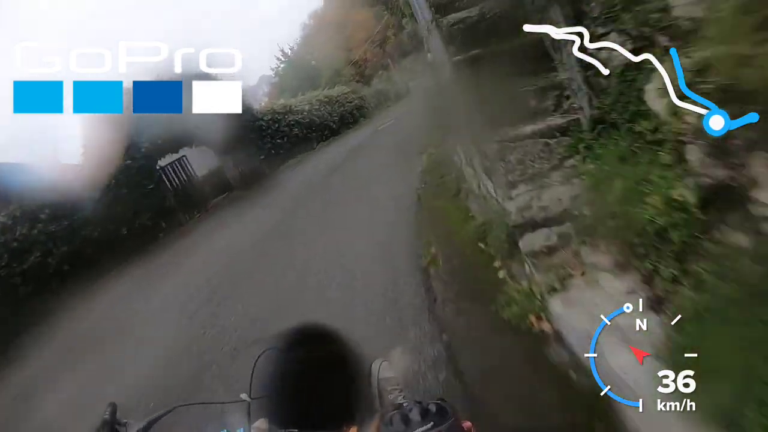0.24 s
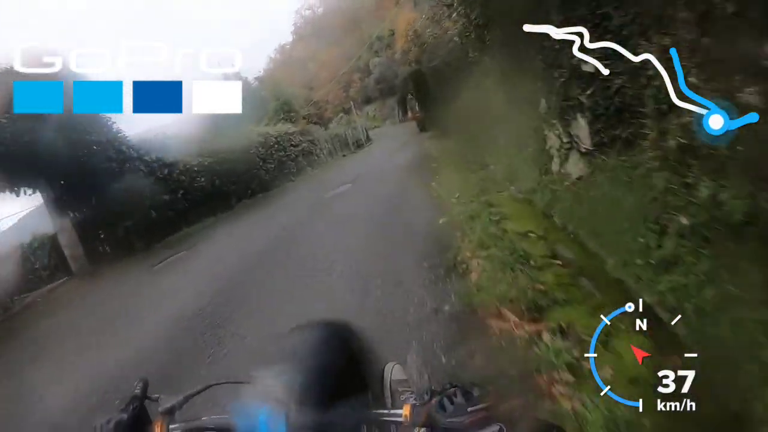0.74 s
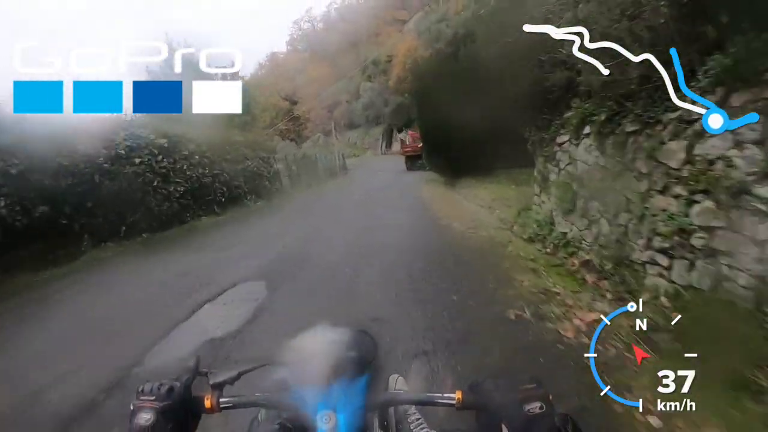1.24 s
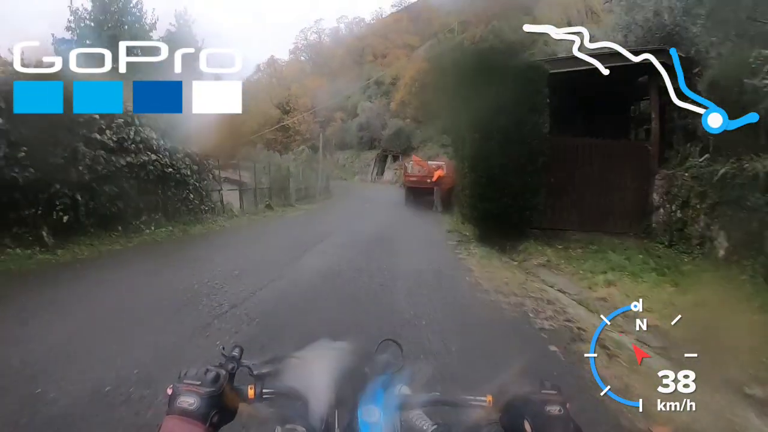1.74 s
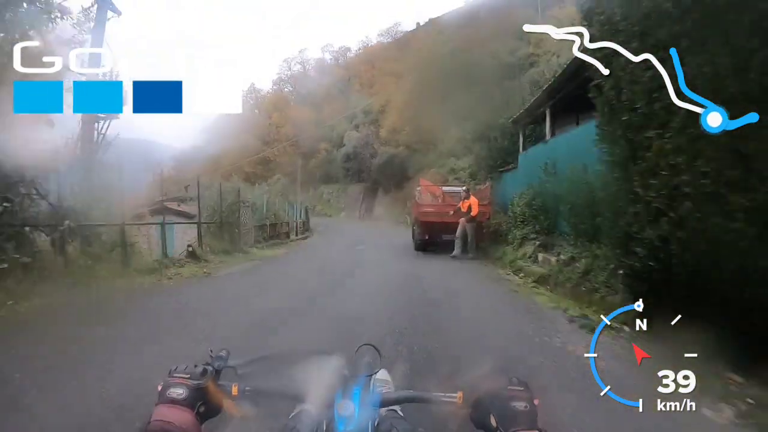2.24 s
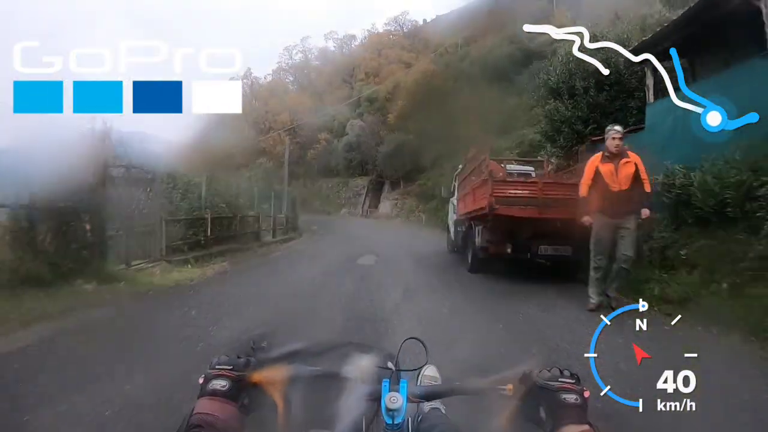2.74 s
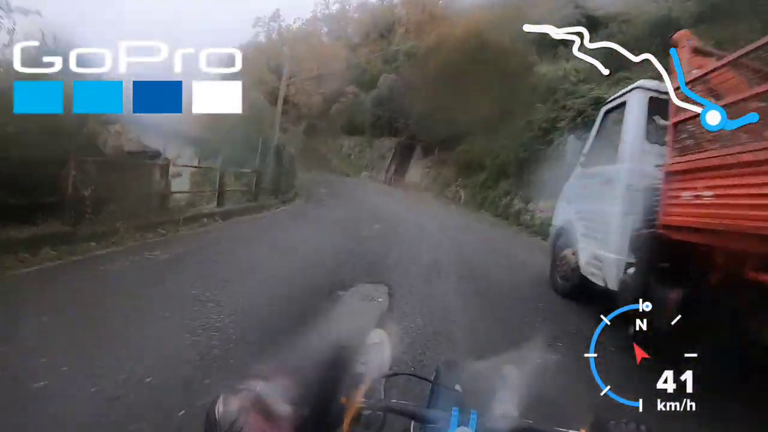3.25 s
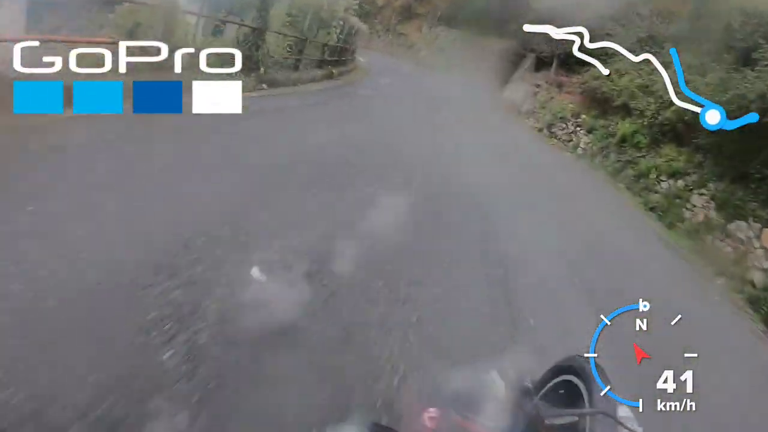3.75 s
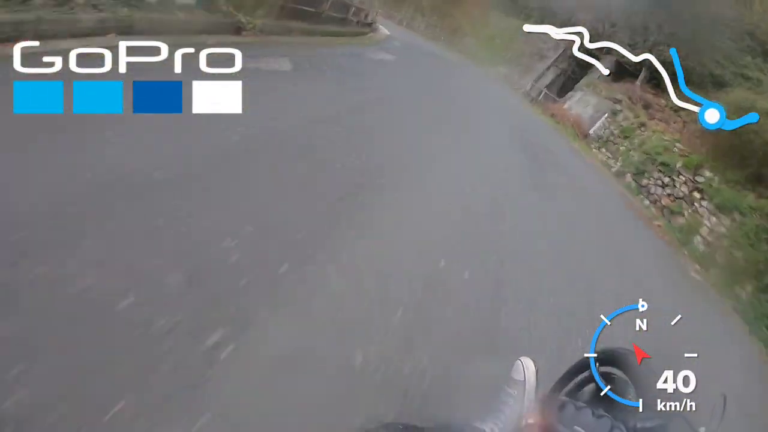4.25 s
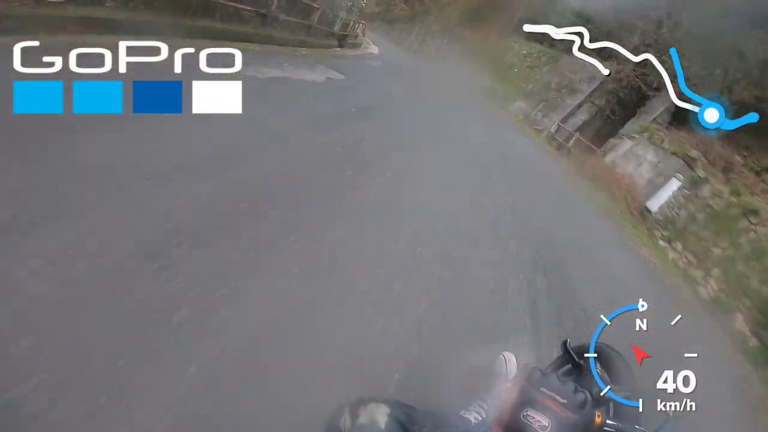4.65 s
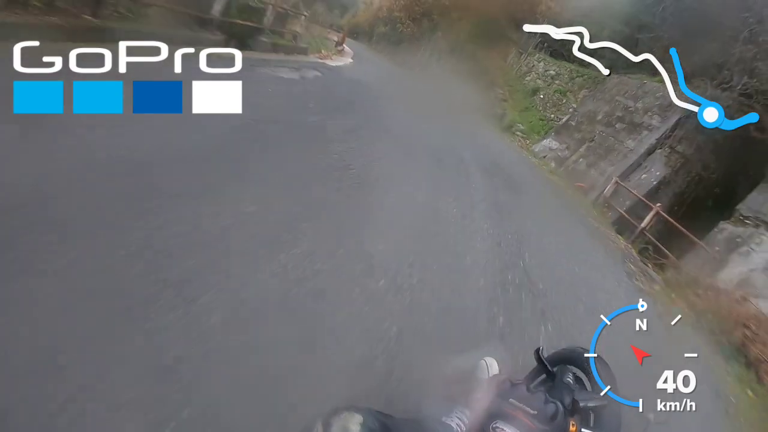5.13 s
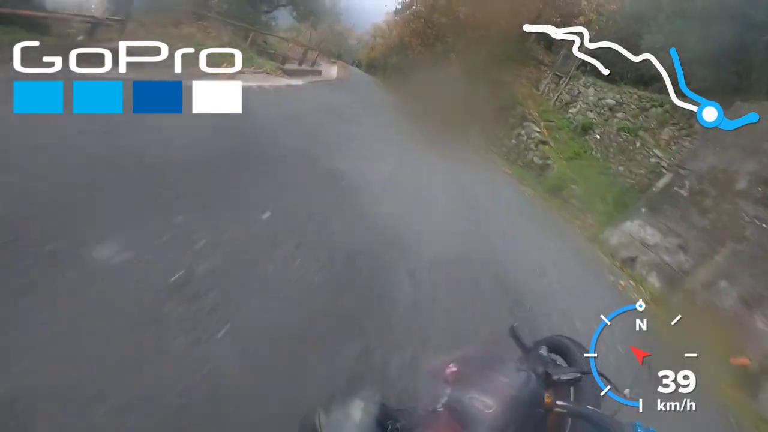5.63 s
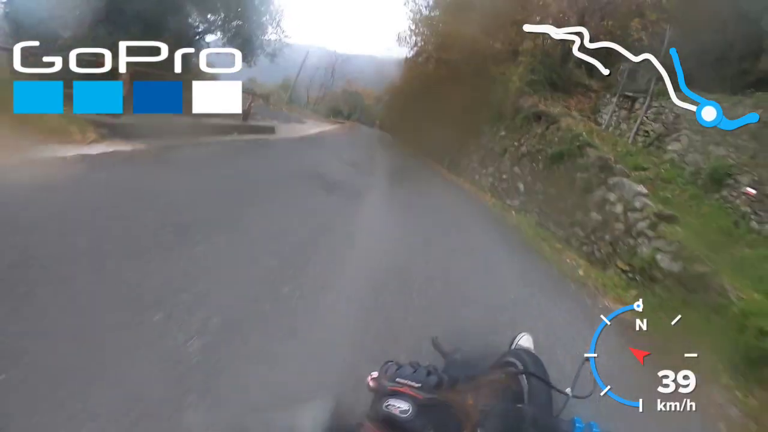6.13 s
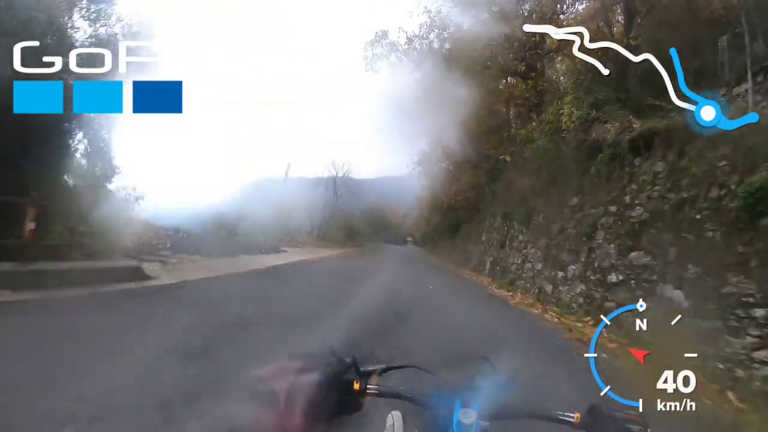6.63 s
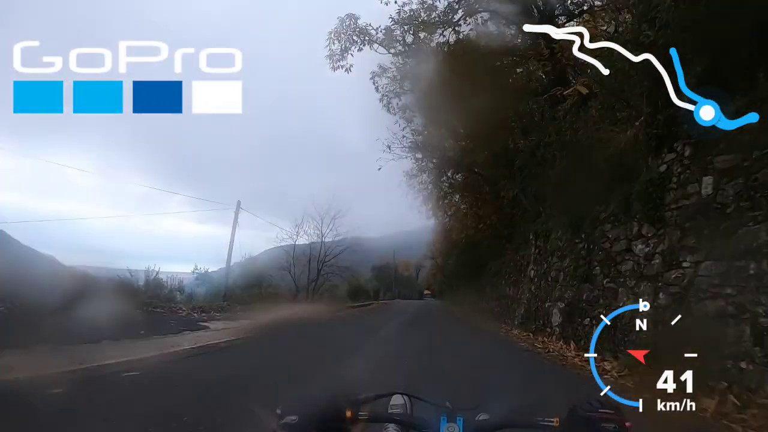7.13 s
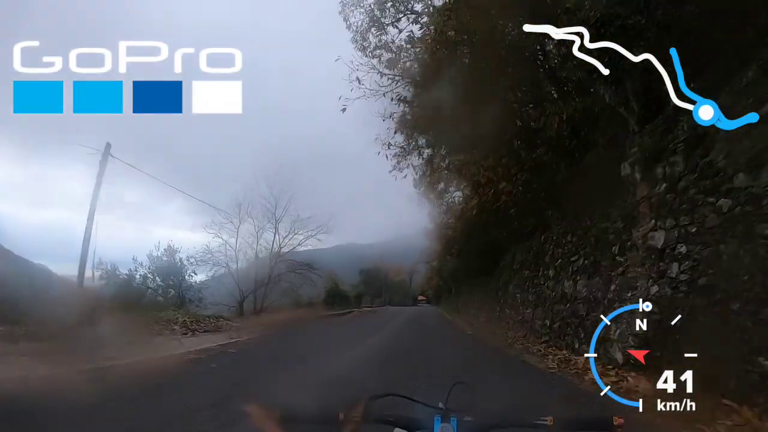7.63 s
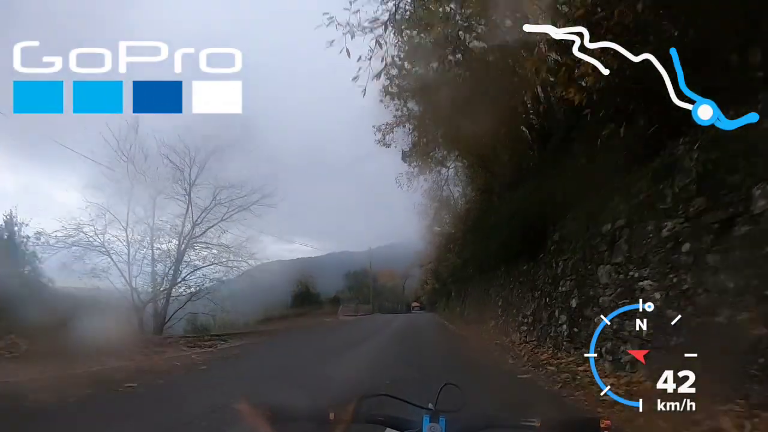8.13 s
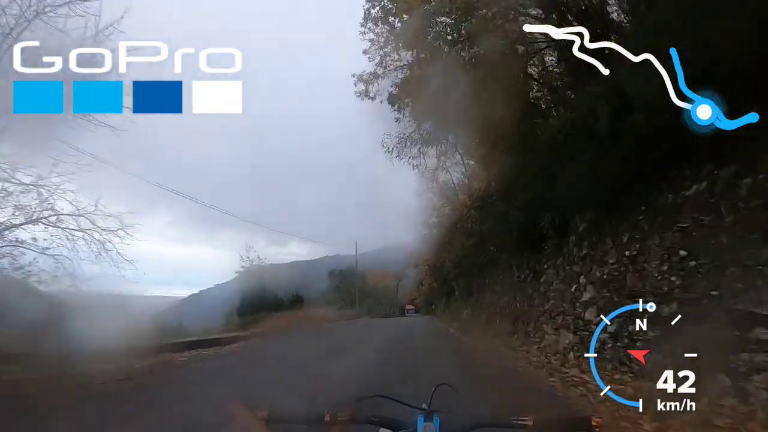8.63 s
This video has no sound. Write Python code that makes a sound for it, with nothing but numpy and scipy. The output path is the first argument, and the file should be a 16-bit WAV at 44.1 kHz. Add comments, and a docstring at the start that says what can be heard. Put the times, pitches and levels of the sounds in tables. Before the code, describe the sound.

A small hard-wheeled trike coasts down a wet asphalt road, low shaking rumble and hollow wheel drumming, brief skids, wind and rattle rising late.

```python
"""A drift trike coasts down a wet mountain road, heard from aboard.
From the start coarse asphalt shakes the frame (a wandering low tone and dull noise) and drums in the hollow
wheels (tiny random hits through resonances), while wet grit sizzles and wind tears past (shaped noise).
Short skids rasp, drops tick on the housing and gritty scuffs burst out; early on, a few pebbles strike the frame.
The rear wheels scrub sideways through a long bend; on the last straight the headwind and rattle rise."""
import sys
import numpy as np
from scipy import signal
from scipy.fft import rfft, irfft
from scipy.io import wavfile
from scipy.ndimage import uniform_filter1d, map_coordinates

SR = 44100
rng = np.random.default_rng(int(sys.argv[2]) if len(sys.argv) > 2 else 0)


def materialize(psi):
    """Save the field psi as 16-bit PCM at rate SR to the path in sys.argv[1].

    A 1-D psi becomes a single channel; in a 2-D psi each row is a channel.
    """
    bounded = np.clip(np.atleast_2d(psi).T, -1, 1)
    quanta = np.round(bounded * 32767).astype(np.int16)
    wavfile.write(sys.argv[1], SR, quanta)


N = 391608
TIME = np.arange(N) / SR

# shaking of the frame, from the coarseness of the road and the speed: [t/s, level/dB]
SHAKE_CURVE = [(0, -39), (.7, -40.5), (1.1, -45), (1.95, -41.5), (2.15, -34.5), (2.85, -31.5), (3.07, -26),
               (3.35, -34.5), (4.05, -34.5), (4.95, -36.5), (5.75, -34.5), (6.4, -41.5), (6.7, -34.5),
               (6.85, -29.5), (8.88, -30)]
# headwind: [t/s, level/dB]
WIND_CURVE = [(0, -72.5), (1.3, -77), (2.3, -70), (2.9, -62), (3.3, -68), (4.2, -72.5), (5.4, -72.5),
              (6.45, -72), (6.9, -62.5), (7.5, -61.5), (8.3, -59.5), (8.88, -60.5)]
# bumps and rough patches that throw the frame: [t/s, level/dB, length/s]
ROAD_BUMPS = [(.29, -37.5, 0.022), (.63, -38, 0.028), (.835, -39.5, 0.023), (1.335, -38.5, 0.011),
              (1.76, -35.5, 0.02), (2.155, -36, 0.019), (2.42, -33, 0.02), (2.935, -30, 0.015),
              (3.01, -24, 0.018), (3.655, -34.5, 0.013), (3.85, -35.5, 0.024), (4.24, -24, 0.011),
              (5.84, -24, .016), (6.12, -31, 0.026), (6.875, -27.5, 0.018), (6.98, -28.5, 0.037),
              (7.21, -25.5, 0.014), (7.3, -28.5, 0.025), (7.61, -29, 0.025), (7.77, -26.5, 0.033),
              (8.085, -22.5, 0.017), (8.37, -23.5, 0.027), (8.56, -25, 0.064), (8.8, -26, 0.016)]
UNEVEN_PER_S = 17  # speed of the road's random unevenness, roughly in changes per second


def from_db(db):
    """Turn decibels into a gain."""
    return 10 ** (np.asarray(db) / 20)


def rms_one(x):
    """Scale a signal to an average power of 1."""
    return x / np.sqrt(np.mean(x ** 2) + 1e-20)


def noise():
    """White noise: an even hiss with all pitches in it."""
    return rng.standard_normal(N)


def drift(rate):
    """Slow random wandering with spread 1; rate is roughly in changes per second."""
    step = 40  # samples between the computed points
    r = np.exp(-2 * step * np.pi * rate / SR)
    settle = 2000  # points dropped while the filter starts up
    slow_noise = rng.standard_normal(N // step + settle + 2)
    slow = signal.lfilter([1], [1, -2 * r, r * r], slow_noise)[settle:]
    return np.interp(np.arange(N) / step, np.arange(len(slow)), rms_one(slow))


def grains(per_s, spread_db):
    """Tiny hits at random times, of uneven size and either sign; rms 1."""
    size_db = spread_db * np.minimum(rng.exponential(1, N), 4)
    sizes = from_db(size_db) * rng.choice([-1, 1], N)
    return rms_one(sizes * (rng.random(N) < per_s / SR))


def clicks(rows):
    """One single-sample click for each row of time and level."""
    out = np.zeros(N)
    for s, db in rows:
        out[round(s * SR)] = from_db(db)
    return out


def coloured(x, spectrum):
    """Strengthen and weaken the pitches of a sound to follow a spectrum; rms 1."""
    hz, db = np.transpose(spectrum)
    bins = np.maximum(np.arange(N // 2 + 1) * SR / N, 1)
    gain = from_db(np.interp(np.log(bins), np.log(hz), db))
    return rms_one(irfft(rfft(x) * gain, N))


def resonate(x, modes):
    """Let a sound excite several resonances side by side, with alternating signs; rms 1."""
    out = 0
    for k, (hz, width, db) in enumerate(modes):
        r = np.exp(-np.pi * width / SR)  # a narrower resonance rings longer
        poles = [1, -2 * r * np.cos(2 * np.pi * hz / SR), r * r]
        ring = (1 - r * r) / 2 * signal.lfilter([1, 0, -1], poles, x)
        out = out + (-1) ** k * from_db(db) * ring
    return rms_one(out)


def cut(x, hz, kind, order=2):
    """Keep only what lies below ("low") or above ("high") a frequency."""
    sos = signal.butter(order, min(hz, SR / 2 - 1), kind, fs=SR, output="sos")
    return signal.sosfilt(sos, x + 1e-18)


def steadied(x, span_s):
    """Even out the swells of a vibration that last longer than span_s."""
    size = max(int(span_s * SR), 2)
    power = uniform_filter1d(uniform_filter1d(x * x, size), size)
    return x / np.sqrt(power + 1e-9)


def wavering(x, share, per_s):
    """Let the pitch wander by a share of itself, by reading the sound now faster, now slower."""
    position = np.arange(N) + np.cumsum(share * drift(per_s))
    return map_coordinates(x, [position], order=3, mode="mirror")


def curve(rows):
    """Join the points of a control with straight lines."""
    return np.interp(TIME, *np.transpose(rows))


def swells(rows):
    """Sum of brief bell-shaped swells in level."""
    return sum(from_db(db) * np.exp(-((TIME - s) / length) ** 2 / 2) for s, db, length in rows)


def thumps(rows):
    """Sum of short tones that swell and fade smoothly."""
    out = 0
    for s, db, length, hz in rows:
        tone = np.sin(2 * np.pi * hz * (TIME - s))
        out = out + np.sqrt(2) * swells([(s, db, length)]) * tone
    return out


def lull(depth_db):
    """Gain that dips on each smooth patch of road."""
    # smooth patches: [t/s, length/s]
    smooth_patches = [(0.52, 0.02), (0.905, 0.01), (0.998, 0.022), (1.414, 0.0088), (2.282, 0.0094),
                      (2.513, 0.036), (2.84, .01), (3.436, .02), (3.974, 0.016), (4.19, 0.014),
                      (4.889, 0.018), (5.246, 0.016), (5.508, 0.025), (5.919, 0.013), (6.014, 0.012),
                      (6.388, 0.028), (6.698, 0.024), (7.083, 0.01), (7.369, 0.0089), (7.483, 0.0069),
                      (7.673, 0.011), (7.853, .016), (8.447, 0.012), (8.664, 0.013)]
    return from_db(depth_db * swells([(s, 0, length) for s, length in smooth_patches]))


def with_slip(straight_db, slip_db):
    """Gain that starts from the level when running straight and gains slip_db at full slip."""
    # sideways slip of the rear wheels, greatest in the long bend: [t/s, slip 0-1]
    slip_curve = [(0, 0.6), (.5, 0.6), (1.35, 0.26), (2.4, 0), (3.35, 0.3), (3.55, 0.85), (4.3, 1),
                  (4.85, 1), (5.95, 0.79), (6.35, 0.55), (7.9, 0.56), (8.5, 0.33), (8.88, 0.36)]
    return from_db(straight_db + slip_db * np.maximum(curve(slip_curve), 0))


def frame():
    """The road bounces the frame and flutters the fork over a dull rumble; bumps throw them harder."""
    # spectrum of the rumble: [f/Hz, relative level/dB]
    rumble_spectrum = [(15, -0.5), (30, 8), (60, 0.5), (85, -0.5), (135, -8.5), (230, -27.5), (400, -42.5),
                       (900, -46.5)]
    # resonance of the fork: [f/Hz, width/Hz, relative level/dB]
    fork_modes = [(103.6, 20, 0)]
    # flutter of the fork: [t/s, level/dB]
    fork_curve = [(0, -58), (.7, -53.5), (1.25, -58.5), (1.65, -47.5), (2.05, -59.5), (3.0, -47.5),
                  (3.5, -50.5), (3.75, -44), (4.1, -42.5), (4.55, -48), (4.85, -40), (5.2, -45),
                  (5.45, -64), (5.75, -43), (6.25, -53.5), (7.0, -48), (8.88, -48)]
    # jolts through the fork: [t/s, level/dB, length/s]
    fork_jolts = [(.54, -44, 0.026), (5.612, -42, 0.0094), (6.874, -41.5, 0.023), (6.956, -40.5, 0.017),
                  (7.568, -42, 0.044), (8.066, -33.5, 0.013), (8.441, -44.5, 0.017), (8.539, -34, 0.017)]
    bounce_hz, wander_share, wander_per_s = 52.43, .11, 16.18

    uneven_shake = from_db(curve(SHAKE_CURVE) + 1.7 * drift(UNEVEN_PER_S))
    shake = uneven_shake * lull(depth_db=-11.5) + swells(ROAD_BUMPS)
    pitch = bounce_hz * (1 + wander_share * drift(wander_per_s))
    bounce = np.sin(2 * np.pi * np.cumsum(pitch) / SR)

    fork = cut(steadied(resonate(noise(), fork_modes), span_s=0.021), 160, "low", order=4)
    flutter = from_db(curve(fork_curve)) + swells(fork_jolts)

    rumble = cut(coloured(noise(), rumble_spectrum), 690, "low")
    rumble = rumble * from_db(2.0 * drift(8.8)) * lull(depth_db=-0.5)
    # the power below 1 makes the rumble grow more slowly than the bounce
    rumble_gain = from_db(-38.5) * rms_one(shake) ** 0.32
    return shake * bounce + rumble_gain * rumble + flutter * fork


def drumming():
    """How hard the road drums the hollow wheels: more with slip and with shaking."""
    usual_shake_db, follows = -38, 0.2  # dB of drumming per dB of shaking
    coarse = from_db(follows * (curve(SHAKE_CURVE) - usual_shake_db))
    return with_slip(straight_db=-49.5, slip_db=4.5) * coarse


def wheels():
    """Stones of the asphalt drum the hollow wheels and rims; larger ones make them boom and knock."""
    # resonances of the hollow wheels, then of the rims: [f/Hz, width/Hz, relative level/dB]
    hollow_modes = [(161.8, 8, 2), (193.4, 41, -6.5)]
    rim_modes = [(263, 31.6, 0.13), (318.6, 43.3, -0.63)]
    # blows that make the hollow wheels boom: [t/s, level/dB, length/s, f/Hz]
    boom_blows = [(.553, -44.5, 0.018, 169), (.837, -52, 0.01, 182), (2.034, -41, 0.0085, 189),
                  (2.687, -38.5, 0.017, 182), (3.52, -38, 0.021, 181), (3.635, -34, 0.005, 200),
                  (3.703, -37, 0.019, 175), (4.066, -41, 0.0094, 163), (4.32, -37, 0.015, 173),
                  (4.54, -37.5, 0.039, 168.4), (4.665, -39.5, 0.061, 174.8), (4.8, -37.5, 0.028, 186),
                  (5.236, -37, 0.01, 196), (6.331, -44.5, 0.022, 190), (6.642, -37, 0.0074, 184),
                  (6.81, -39, 0.013, 189), (7.066, -42, 0.016, 177), (7.65, -39, 0.029, 157),
                  (8.039, -39.5, 0.02, 182), (8.449, -39, 0.011, 167)]
    # coarse stones that knock on the rims: [t/s, level/dB, f/Hz]
    rim_knocks = [(0.461, -43, 306), (.578, -45.5, 342), (0.915, -52, 318), (1.792, -48.5, 295),
                  (2.687, -49, 322), (3.416, -47.5, 293), (3.719, -43, 339), (3.94, -41.5, 299),
                  (4.226, -41.5, 272), (4.54, -45.5, 290), (5.095, -45, 278), (5.226, -46.5, 289),
                  (5.364, -47, 286), (5.889, -41.5, 273), (6.088, -41, 305), (6.546, -50, 297),
                  (8.455, -43.5, 262), (8.525, -42, 278)]
    knock_s = 0.011  # length of a knock

    hollow = resonate(grains(per_s=300, spread_db=1.5), hollow_modes)
    hollow = cut(cut(hollow, 256.0, "low", order=6), 138, "high", order=4)
    rims = resonate(grains(per_s=280, spread_db=4.0), rim_modes)
    rims = cut(cut(rims, 420, "low", order=4), 220, "high", order=4)

    # a small share of each bump reaches the rims
    rim_gain = with_slip(straight_db=-58, slip_db=8) + from_db(-34) * swells(ROAD_BUMPS)
    rolling = drumming() * steadied(hollow, span_s=0.06) + rim_gain * steadied(rims, span_s=0.048)
    uneven = from_db(1.5 * drift(UNEVEN_PER_S))
    knocks = thumps([(s, db, knock_s, hz) for s, db, hz in rim_knocks])
    return thumps(boom_blows) + knocks + uneven * rolling


def tyres():
    """The tyres scrub over the asphalt and ring at two pitches, the high one always faintly there."""
    # spectrum of the scrub: [f/Hz, relative level/dB]
    scrub_spectrum = [(100, -9), (240, 3.5), (330, 8), (410, 3), (510, -0.5), (640, -4.5), (950, -11),
                      (1280, -18.5), (2000, -29), (4000, -27)]
    # high ring, then low ring: [f/Hz, width/Hz, relative level/dB]
    high_modes = [(722.6, 19, 0)]
    low_modes = [(328, 33, 0)]
    # scrub of the rear sleeves on the asphalt, greatest in the bend: [t/s, level/dB]
    scrub_curve = [(0, -57), (.8, -54.5), (1.15, -57.5), (2.4, -58.5), (2.9, -55.5), (3.35, -57.5),
                   (3.55, -52), (4.25, -50.5), (4.6, -53), (4.9, -56), (5.25, -53.5), (6.3, -57),
                   (8.88, -59)]
    # stretches where the tyres ring louder: [t/s, high level/dB, low level/dB, length/s]
    louder_rings = [(0.51, -66, -57, 0.31), (1.865, -70, -55, 0.37), (3.805, -70.5, -65.5, 0.51),
                    (8.298, -62.5, -75, 1)]

    scrub = cut(coloured(noise(), scrub_spectrum), 3500, "low") * from_db(1 * drift(12))
    high = cut(steadied(resonate(noise(), high_modes), span_s=0.22), 1000, "low")
    high = wavering(high, share=.007, per_s=13)
    low = cut(steadied(resonate(noise(), low_modes), span_s=0.26), 420, "low", order=4)

    # a faint high ring is there at all times
    high_gain = from_db(-71.5) + swells([(s, db, length) for s, db, _, length in louder_rings])
    low_gain = swells([(s, db, length) for s, _, db, length in louder_rings])
    waver = from_db(0.5 * drift(7.7))  # the high ring's level wavers slightly
    return from_db(curve(scrub_curve)) * scrub + waver * high_gain * high + low_gain * low


def skidding():
    """Strength of the skids: each bites within milliseconds and dies away."""
    # short gritty skids of the rear wheels: [start t/s, relative level/dB, decay/s]
    skid_rows = [(.275, -77.5, 0.21), (.452, -69, 0.0075), (.545, -75, 0.027), (.665, -72, .03),
                 (.728, -70, 0.024), (.822, -67, 0.016), (.876, -63, 0.0069), (1.665, -76, 0.055),
                 (3.262, -71, 0.031), (3.36, -77, 0.18), (3.466, -66.5, 0.07), (3.572, -75.5, .12),
                 (3.697, -71.5, 0.062)]
    bite_s = .004  # time a skid takes to bite
    out = 0
    for s, db, decay_s in skid_rows:
        since = np.maximum(TIME - s, 0)
        out = out + from_db(db) * (1 - np.exp(-since / bite_s)) * np.exp(-since / decay_s)
    return out


def wet_road():
    """Grit and water crackle under the tyres, ring in the wheel shells and fly off as spray."""
    # sizzle of water and grit on the road: [t/s, relative level/dB]
    wet_curve = [(0, -75), (.8, -73.5), (1.05, -75), (1.5, -77), (1.75, -75), (2.3, -75.5), (3.15, -73),
                 (3.5, -71), (4.0, -75), (4.5, -77), (5.75, -77.5), (6.35, -78.5), (7.3, -75.5),
                 (8.88, -72.5)]
    # resonances of the wheel shells: [f/Hz, width/Hz, relative level/dB]
    shell_modes = [(1524, 100, 3), (2233, 230, -1.5), (3840, 150, -6)]
    # spectra of the grit, then of the spray: [f/Hz, relative level/dB]
    grit_spectrum = [(500, -8.5), (950, 8), (1300, 5), (1900, -3), (2600, -1), (3300, -1), (4100, -6.5),
                     (4800, -9), (5500, -14.5), (8000, -46)]
    spray_spectrum = [(2000, -8), (4800, 2.5), (6500, 2.5), (8600, -2), (10000, -15), (12000, -25)]
    usual_wind_db, blown_off = -70.5, 0.23  # dB of spray lost per dB of wind

    crackle = coloured(grains(per_s=6000, spread_db=2.0) * from_db(1.0 * drift(16)), grit_spectrum)
    shell_hits = grains(per_s=2000, spread_db=4.0) * from_db(0.95 * drift(22))
    shells = cut(resonate(shell_hits, shell_modes), 4900, "low", order=4)
    mist = coloured(grains(per_s=18000, spread_db=5.0), spray_spectrum) * from_db(1 * drift(9.8))

    sizzle = from_db(curve(wet_curve)) * (from_db(5.5) * crackle + from_db(4.5) * shells)
    # the headwind carries the spray away
    wind_loss = from_db(-blown_off * (curve(WIND_CURVE) - usual_wind_db))
    spray_gain = with_slip(straight_db=-84.5, slip_db=0.5) * wind_loss
    # skids add loose grit and fainter spray
    thrown_up = skidding() * (from_db(-6) * crackle + from_db(-21) * mist)
    return sizzle + spray_gain * mist + thrown_up


def headwind():
    """Air tears past the housing in quick, uneven puffs of noise and whistles hoarsely in the gusts."""
    # spectrum of the rushing air: [f/Hz, relative level/dB]
    air_spectrum = [(390, -3), (495, 15), (800, -5.5), (1060, 4.5), (1300, -8), (1750, 1), (1950, -6),
                    (2230, 3.5), (2650, -10.5), (3250, -9), (3700, -8), (4300, -14.5), (5500, -21),
                    (9000, -46.5)]
    # gusts that make the housing whistle: [t/s, level/dB, length/s]
    whistle_gusts = [(1.85, -78, 0.37), (2.65, -71, 0.32), (6.93, -68.5, 0.29), (7.6, -76.5, 0.21),
                     (8.45, -68, 0.18)]
    # resonance of the whistle: [f/Hz, width/Hz, relative level/dB]
    whistle_modes = [(1072, 61, 0)]

    puffs = from_db(2.1 * drift(74) + .5 * drift(7.2))
    rush = coloured(noise() * puffs, air_spectrum)
    whistle = cut(resonate(noise(), whistle_modes), 1400, "low", order=4)
    return from_db(curve(WIND_CURVE)) * rush + swells(whistle_gusts) * whistle


def rattle():
    """The wind sets small loose parts chattering: random knocks through resonances, stronger with wind."""
    # resonances of the loose parts: [f/Hz, width/Hz, relative level/dB]
    part_modes = [(2080, 140, -3), (3080, 550, -7), (3750, 410, -4)]
    strength = from_db(curve(WIND_CURVE))
    knocks = grains(per_s=190, spread_db=2.2)
    chatter = cut(resonate(knocks, part_modes), 4500, "low", order=6)
    # the power above 1 makes the rattle grow faster than the wind
    return from_db(-75.5) * rms_one(strength ** 1.9) * cut(chatter, 1800, "high")


def skids():
    """The hard rear sleeves rasp over grit: dense tiny hits make them resonate."""
    # resonances of the rasp: [f/Hz, width/Hz, relative level/dB]
    rasp_modes = [(1610, 88, 13.5), (2250, 230, 4), (3900, 260, 7.5), (4920, 130, -4.5)]
    rasp = resonate(grains(per_s=2900, spread_db=4), rasp_modes)
    return from_db(8.5) * skidding() * cut(rasp, 4900, "low", order=6)


def drops():
    """Single drops tick on the resonant housing and scatter into fainter droplets."""
    # drops hitting the housing: [t/s, relative level/dB]
    drop_hits = [(0.3623, -59), (1.1707, -67.5), (1.9254, -63), (2.135, -65), (3.058, -58.5),
                 (4.501, -60.5), (5.3477, -61), (5.903, -64), (6.3683, -62.5), (7.697, -64.5)]
    # resonances of the housing: [f/Hz, width/Hz, relative level/dB]
    housing_modes = [(4300, 1200, 3), (7700, 3200, 4.5)]
    # the droplets are strongest 4 ms after the drop
    scatter_gain = swells([(s + .004, db, .005) for s, db in drop_hits])
    scatter = scatter_gain * grains(per_s=1000, spread_db=6.5)
    ticks = resonate(clicks(drop_hits) + from_db(-32) * scatter, housing_modes)
    return from_db(-97.0) * cut(ticks, 3000, "high")


def splashes():
    """Wet patches throw a short, broad burst of water and grit, made of many tiny hits."""
    # splashes: [t/s, level/dB, length/s]
    bursts = [(.6, -66, 0.017), (.83, -72.5, 0.012), (5.825, -65, 0.034)]
    # spectrum of a splash: [f/Hz, relative level/dB]
    splash_spectrum = [(700, 0), (1500, 7), (2800, -6), (3700, 3), (4900, -5.5), (5800, -15), (9000, -28)]
    return swells(bursts) * coloured(grains(per_s=2000, spread_db=3.0), splash_spectrum)


def pebbles():
    """Each flung pebble makes the frame resonate in a short, hard tick."""
    # pebbles flung against the frame: [t/s, peak level before the top is cut/dB]
    pebble_hits = [(.884, -54), (2.5228, -58), (2.528, -46), (3.077, -49)]
    # resonances of the tick: [f/Hz, width/Hz, relative level/dB]
    tick_modes = [(2300, 500, 1), (4000, 700, -1), (6800, 1600, -11)]
    tick = resonate(signal.unit_impulse(SR // 50), tick_modes)
    tick = tick / np.abs(tick).max()
    return cut(signal.fftconvolve(clicks(pebble_hits), tick)[:N], 8000, "low")


def scene():
    """Everything rides along close to the one microphone."""
    road = frame() + wheels() + tyres() + wet_road()
    air = headwind() + rattle()
    brief = skids() + drops() + splashes() + pebbles()
    return (road + air + brief)[None]


def record(dry):
    """Cut the deepest bass and, steeply, the top."""
    top_cut = signal.butter(16, 10400, fs=SR, output="sos")  # Hz
    return signal.sosfilt(top_cut, cut(dry, 7.0, "high"))


dry = scene()
out = record(dry)
materialize(out)
```